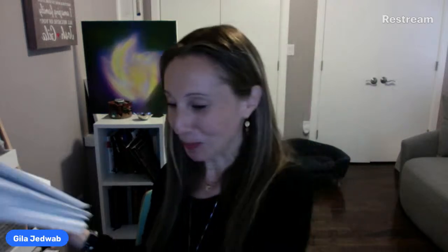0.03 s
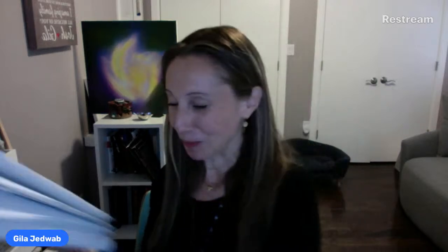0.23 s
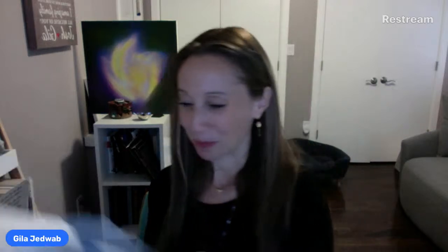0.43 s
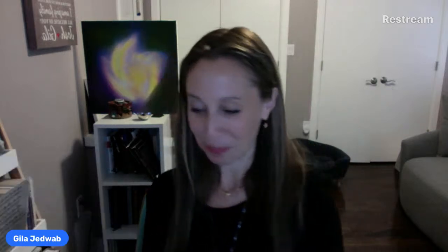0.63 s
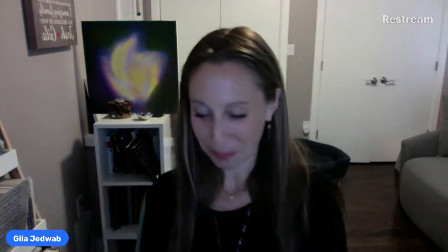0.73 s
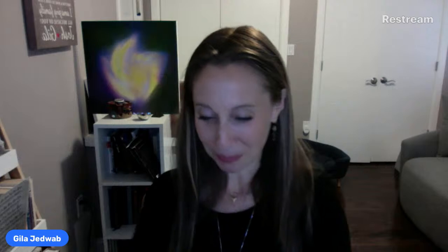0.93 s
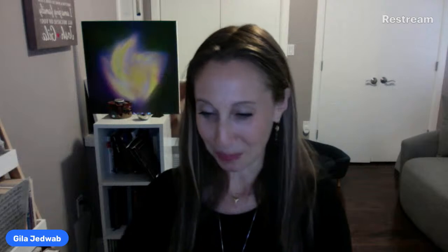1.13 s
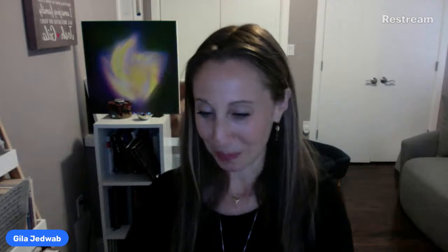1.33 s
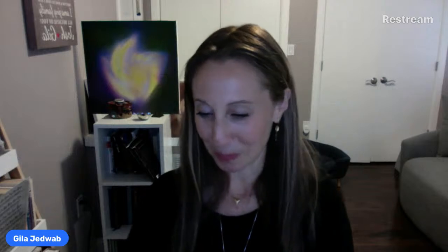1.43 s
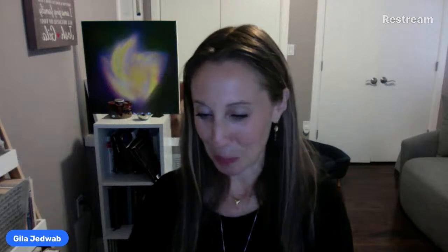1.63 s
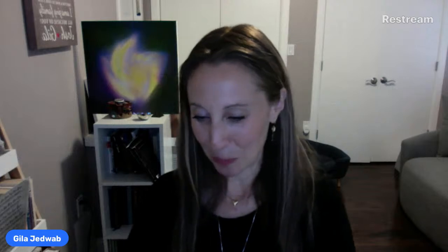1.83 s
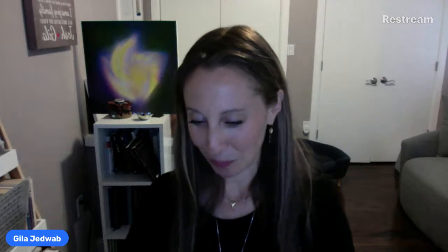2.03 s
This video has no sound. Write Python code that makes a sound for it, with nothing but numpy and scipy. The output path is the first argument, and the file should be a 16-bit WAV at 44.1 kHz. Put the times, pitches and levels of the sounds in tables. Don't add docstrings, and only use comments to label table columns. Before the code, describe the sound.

A stack of paper slaps onto a wooden desk, sheets are leafed through, then slapped down again

```python
import sys
import numpy as np
from scipy import signal
from scipy.fft import rfft, irfft
from scipy.io import wavfile
from scipy.ndimage import uniform_filter1d

SR = 44100
rng = np.random.default_rng(int(sys.argv[2]) if len(sys.argv) > 2 else 0)


def pcm_store(signal):
    levels = np.round(np.clip(np.atleast_2d(signal), -1, 1) * 32767)
    wavfile.write(sys.argv[1], SR, levels.astype(np.int16).T)


def volts_from_db(level):
    exponent = np.asarray(level, float) / 20
    return 10 ** exponent


N = 92257


def evened(x):
    return x / np.sqrt(np.mean(x ** 2) + 1e-20)


def read(points, hz):
    f, value = np.transpose(points)
    return np.interp(np.log(hz + 1), np.log(f + 1), value)


def add(mix, s, sound):
    part = mix[round(s * SR):][:len(sound)]
    part += sound[:len(part)]


def smoothed(x, size):
    return uniform_filter1d(uniform_filter1d(x, size=size), size=size)


def resonate(x, hz, width):
    turn = np.exp(2j * np.pi * np.cumsum(hz * np.ones(len(x))) / SR)
    r = np.exp(-np.pi * width / SR)
    return 2 * (turn * signal.lfilter([1 - r], [1, -r], x / turn)).real


def resonate_twice(x, hz, width):
    return resonate(resonate(x, hz, width), hz, width)


def colour(x, points):
    gain = volts_from_db(read(points, np.fft.rfftfreq(len(x), 1 / SR)))
    return irfft(rfft(x) * gain, len(x))


def decayed(x, t60, size=256):
    hz, t, z = signal.stft(x, SR, nperseg=size)
    z = z * volts_from_db(-60 * t / read(t60, hz)[:, None])
    return signal.istft(z, SR, nperseg=size)[1][:len(x)]


def patchy(x):
    z = signal.stft(x, nperseg=256)[2]
    patches = uniform_filter1d(rng.standard_normal(z.T.shape), size=5, axis=0)
    patches = evened(uniform_filter1d(patches, size=6, axis=1))
    return evened(signal.istft(z * volts_from_db(3 * patches).T, nperseg=256)[1][:N])


def fibres():
    clicks_per_s, spread_db, clump_db = 22000, 2.5, 1
    clumps = evened(smoothed(rng.standard_normal(N), 90))
    size = volts_from_db(spread_db * np.minimum(rng.exponential(1, N), 4) + clump_db * clumps)
    return size * (rng.random(N) < clicks_per_s / SR) * rng.choice([-1., 1.], N)


def rubbing():
    # [t/s, rubbing level/dB, sheet body relative level/dB]
    slide = [(0, -56.5, -9.5), (.06, -58.5, -7), (.12, -47.5, -2), (.29, -77.5, 0), (.45, -88.5, -4.5),
             (.47, -50, -15), (.595, -80, 7), (.69, -54, 1.5), (.745, -47, -10.5), (.806, -40.5, -6.5),
             (.9, -45, -9), (.975, -63, -4.5), (1.09, -54.5, -14.5), (1.2, -32.5, -21.5),
             (1.344, -26, -8.5), (1.522, -52, -7.5), (1.56, -67, 7), (1.75, -52, -0.5), (1.871, -86.5, 6)]
    # [peak t/s, rubbing level/dB, rise to 20 dB down/s, fall/s,
    # sheet body relative level/dB]
    strokes = [(0.479, -43.5, 0.017, 0.0622, -14.5), (0.615, -37, 0.012, 0.0154, -5),
               (0.634, -61.5, .01, 0.02, 12.5), (0.718, -35, 0.0093, 0.006, -20.5),
               (0.763, -36, 0.014, 0.016, -2), (0.793, -25.5, .012, 0.012, -6),
               (0.811, -38, 0.0052, .025, -6.5), (.832, -24.5, 0.0048, 0.0178, -19),
               (.855, -35.5, 0.014, 0.0377, -15.5), (0.913, -33.5, 0.022, 0.0467, -20.5),
               (1.026, -54.5, 0.024, 0.044, -19), (1.141, -46.5, .04, 0.026, -22),
               (1.194, -33, .018, 0.16, -14.5), (1.248, -22.5, 0.0022, 0.00444, -15.5),
               (1.269, -26, 0.017, 0.017, -22), (1.467, -58, 0.0037, 0.052, -6.5),
               (1.594, -53.5, 0.033, 0.0428, 7.5), (1.607, -33.5, 0.0079, 0.024, -5.5),
               (1.686, -57, .004, 0.00884, -3), (1.717, -47.5, 0.0045, .004, -26),
               (1.727, -39, .005, 0.0098, -20), (1.738, -43, 0.018, 0.018, -10)]
    # [f/Hz, level/dB per Hz]
    hiss_spectrum = [(3000, -28), (6000, -14.5), (8000, -11), (8800, -3), (10700, 2), (15000, -2),
                     (16000, -4.5)]
    # [f/Hz, width/Hz, level/dB]
    modes = [(2300, 1000, -5), (2970, 1800, 0.5), (4700, 1100, -9.5), (6574, 1300, -9), (750, 260, -13),
             (1720, 1200, -13), (1100, 1900, -16), (4159, 1500, -3)]
    t = np.arange(N) / SR
    s, db, body_db = np.transpose(slide)
    hiss_power = volts_from_db(np.interp(t, s, db)) ** 2
    body_power = volts_from_db(np.interp(t, s, db + body_db)) ** 2
    for peak, db, rise, fall, body_db in strokes:
        away = np.where(t < peak, (peak - t) / rise, (t - peak) / fall)
        power = volts_from_db(db - 20 * away ** 2) ** 2
        hiss_power = hiss_power + power
        body_power = body_power + power * volts_from_db(body_db) ** 2

    clicks, body = fibres(), np.zeros(N)
    for f, width, db in modes:
        bend = evened(smoothed(rng.standard_normal((2, N)), 1500))
        hz, level_db = f * (1 + 0.025 * bend[0]), db + 2 * bend[1]
        body = body + volts_from_db(level_db) * evened(resonate_twice(clicks, hz, width))
    body = signal.sosfilt(signal.butter(2, 380, "high", fs=SR, output="sos"), body)
    hiss = colour(fibres(), [(20, -68.5), (1500, -43.5), *hiss_spectrum])
    return np.sqrt(hiss_power) * patchy(hiss) + np.sqrt(body_power) * patchy(body)


def room(x):
    # [f/Hz, t60/s]
    t60 = [(100, 0.25), (500, 0.16), (2000, 0.34), (6000, 0.1), (16000, 0.25)]
    taps = np.zeros(SR // 2)
    at = np.arange(200, len(taps) - 20, 20)
    taps[at + rng.integers(0, 20, len(at))] = rng.choice([-1., 1.], len(at))
    tail = decayed(taps, t60)
    return signal.fftconvolve(x, tail / np.linalg.norm(tail))[:N]


def air():
    # [f/Hz, level/dB per Hz]
    spectrum = [(18, -52.5), (30, -25), (404, 1.5), (1350, -9), (3580, -12.5), (3870, -21), (4650, -18),
                (6050, -20.5), (16000, -27.5)]
    # [t/s, level/dB]
    gate_open = [(0, 19), (.07, 19.5), (0.349, -1.5), (.46, -1.5), (.55, 6.5), (1.3, 6), (1.8, 3.5),
                 (2.09, -22.5)]
    # [f/Hz, width/Hz, level/dB]
    leftovers = [(1620, 200, -92.5), (2300, 250, -95), (3600, 250, -97.5)]
    rumble = evened(resonate_twice(rng.standard_normal(N), 289, 150))
    rumble = rumble + 0.3 * evened(resonate_twice(rng.standard_normal(N), 130, 50))
    gate = volts_from_db(-74 + np.interp(np.arange(N) / SR, *np.transpose(gate_open)))
    hiss = volts_from_db(-77) * patchy(colour(rng.standard_normal(N), spectrum))
    bands = sum(volts_from_db(db) * patchy(resonate_twice(rng.standard_normal(N), hz, width))
                for hz, width, db in leftovers)
    return hiss + bands + gate * rumble


def scrape(s, db, hz, width, half):
    reach = 0.06
    t = np.arange(-reach, reach, 1 / SR)
    grit = rng.standard_normal(len(t)) * volts_from_db(3.4 * np.minimum(rng.exponential(1, len(t)), 4))
    envelope = volts_from_db(db - 6.5 - 20 * np.abs(t / half) ** 3)
    sound = envelope * evened(resonate_twice(grit, hz, width))
    skip = max(round((reach - s) * SR), 0)
    return s + t[skip], sound[skip:]


def landing(s, crack_db, slap_db, desk_db, pitch):
    # [f/Hz, level/dB, t60/s]
    modes = [(61, -17, 0.21), (96.5, -13.5, 0.45), (142.44, 2, 0.23), (152.8, -10, 0.33),
             (251.81, -1.5, 0.2), (321.63, 3.5, 0.15), (429.6, -10, .2), (554.4, -8.5, 0.19),
             (680, -10, 0.35), (740, -16.5, 0.067), (849, -10.5, 0.078), (1111, -25.5, 0.18)]
    # [f/Hz, level/dB per Hz]
    slap_spectrum = [(35, -34), (70, -4), (350, -0.5), (900, -4.5), (2470, -10), (4600, -14.5), (7060, -25),
                     (9130, -17.5), (16000, -29)]
    # [f/Hz, t60/s]
    slap_t60 = [(60, 0.44), (300, 0.3), (1000, 0.3227), (3000, 0.25), (8000, 0.17), (16000, 0.24)]
    crack_s, burst_s, desk_rise_s = 0.00024, 0.0052, 0.0046
    slap_tail_db, scatter_db = -13.5, 7.5
    tail_cut_s = 0.3
    t = np.arange(0, .5, 1 / SR)
    damping = 2.16 ** (10 * (1 - pitch))

    crack = np.sin(2 * np.pi * 2000 * t) * t / crack_s * np.exp(1 - t / crack_s)
    crack = crack + .6 * np.sin(2 * np.pi * 5000 * t) * np.exp(-t / 0.00035)
    crack = crack + .5 * np.sin(2 * np.pi * 9500 * t) * np.exp(-t / 0.00017)

    slap = decayed(evened(colour(rng.standard_normal(len(t)), slap_spectrum)), slap_t60)
    slap = slap * np.minimum(t / .001, 1)
    slap = slap * (np.exp(-t / burst_s) + volts_from_db(slap_tail_db - 100 * (damping - 1) * t))

    desk = np.zeros(len(t))
    for hz, db, t60 in modes:
        chance, phase = rng.random(2)
        envelope = volts_from_db(db + scatter_db * (2 * chance - 1.5) - 60 * damping * t / t60)
        desk = desk + envelope * np.sin(2 * np.pi * (hz * pitch * t + phase))
    desk = desk * (1 - np.exp(-t / desk_rise_s))
    desk_gain = volts_from_db(desk_db - 20 * (damping * t / tail_cut_s) ** 4)
    return s, volts_from_db(crack_db) * crack + volts_from_db(slap_db) * slap + desk_gain * desk


def snap(s, db, hz, t60, tick_db):
    sag = 0.065
    t = np.arange(0, .2, 1 / SR)
    ring = np.zeros(len(t))
    for ratio, share in [(1, 0.898), (0.99, 0.424), (0.68, 0.375), (1.2, 0.28), (1.6, 0.2)]:
        ring = ring + share * np.sin(2 * np.pi * hz * ratio * t * (1 + sag - sag * t / t60))
    rise = np.sin(np.pi / 2 * np.minimum(t * hz / 2.29, 1)) ** 2
    ring = .5 * rise * volts_from_db(-60 * t / t60) * ring

    tick = rng.standard_normal(len(t)) * t / 0.0012 * np.exp(1 - t / 0.001035)
    band = [min(0.59 * hz, 2000), min(1.31 * hz, 15000)]
    tick = signal.sosfilt(signal.butter(2, band, "band", fs=SR, output="sos"), tick)
    return s, volts_from_db(db) * (ring + volts_from_db(tick_db) * tick)


def scene():
    # [middle t/s, level/dB, f/Hz, width/Hz, half length/s]
    scrapes = [(.02, -60.5, 1379, 900, 0.081), (0.077, -46, 5473, 1500, 0.0083),
               (.471, -48.5, 4732, 200, 0.0056), (.477, -48, 750, 301.7, 0.00615),
               (.487, -48.5, 4810, 700, 0.0075), (.542, -46.5, 1644, 700, 0.0076),
               (.618, -29, 4586, 503, 0.00945), (.616, -39, 5680, 500, 0.0103),
               (.617, -33.5, 2426, 700, 0.01303), (0.62, -38, 3420, 500, 0.0108),
               (0.641, -57, 5530, 600, 0.0086), (.642, -47.5, 4570, 700, .016),
               (0.712, -22.5, 2300, 700, 0.0061), (0.734, -34, 2570, 1177, 0.018),
               (.761, -42.5, 2440, 800, 0.023), (.765, -43, 4435, 888.3, 0.0052),
               (0.79, -30, 4700, 1100, .011), (.793, -34.5, 1990, 804.6, 0.021),
               (.817, -37.5, 4482, 1100, .012), (0.836, -30, 2198, 500, 0.011),
               (0.837, -36, 7500, 1525, 0.0079), (0.851, -38, 2300, 506.4, 0.0094),
               (0.871, -32, 2335, 613, 0.0051), (0.904, -43, 4700, 707, 0.014),
               (.912, -50, 2179, 400, 0.028), (1.081, -56, 1517, 1789, 0.0067),
               (1.162, -44, 1770, 601, 0.0042), (1.176, -50, 5130, 399.6, 0.0051),
               (1.199, -43.5, 2390, 305.8, 0.005), (1.552, -52.5, 2300, 300, 0.01),
               (1.594, -35.5, 1890, 877, 0.0239), (1.6, -36, 3170, 1100, 0.0152),
               (1.649, -54, 820, 248.1, 0.0136), (1.682, -50, 1710, 500, 0.0056),
               (1.764, -53, 700, 150, 0.0188), (.72, -38.5, 4700, 875.6, 0.0158),
               (.728, -33.5, 623, 396, 0.018), (1.64, -41.5, 2073, 897, 0.0283),
               (1.324, -20, 2060, 1220, 0.0123), (.088, -19, 803.4, 347, .007)]
    # [t/s, crack peak level/dB, slap level/dB, desk level/dB, desk pitch factor]
    landings = [
        (.075, -39.5, -31, -53, 1.02),
        (0.0825, -1.5, -11.5, -20.5, 1.03),
        (.121, -27, -21.5, -18, 0.9884),
        (.133, -45.5, -31.5, -25, 0.992),
        (1.3143, -20.5, -20.5, -29.5, 0.9685),
        (1.3297, -10, -16.5, -13.5, 0.837),
        (1.345, -34.5, -31.5, -21, 0.92),
        (1.361, -40.5, -22, -26, 0.95),
        (1.39, -50.5, -34.5, -34.5, .92),
    ]
    # [t/s, peak level/dB, f/Hz, ring t60/s, tick relative level/dB]
    snaps = [(.483, -12.5, 759.3, 0.0399, -15), (.497, -18.5, 711.4, 0.0715, -30),
             (.505, -29.5, 753, 0.0613, -34.5), (.539, -28, 795, 0.0279, -12),
             (.547, -31, 704, 0.1054, -13), (.604, -50, 12300, 0.0143, -29.5),
             (0.7047, -4, 2300, 0.0155, -30.5), (.7055, -17, 680, 0.036, 0.5),
             (.709, -20, 1100, 0.0296, 9.5), (.713, -23, 2740, 0.016, -28), (.787, -33, 704.2, 0.049, -9.5),
             (.833, -32, 740, 0.038, -28), (.988, -42.5, 2070, 0.034, -1.5), (1.159, -35, 1475, 0.027, 4),
             (1.2383, -4, 10460, 0.00442, -20), (1.24, -29, 750, 0.0205, -24.5),
             (1.463, -37, 2347, 0.045, -15), (1.465, -25, 4365, 0.0064, -15),
             (1.59, -34.5, 739, 0.042, -14.5), (1.6078, -10.5, 3183, 0.00547, -27),
             (1.612, -16, 2094, 0.00705, -8), (1.685, -36, 732.3, 0.035, -20.5),
             (1.717, -23, 9070, 0.0343, -42), (1.732, -32, 3313, 0.047, -18),
             (1.2385, -17.5, 4700, 0.0032, -5.5)]
    near = rubbing()
    for row in scrapes:
        add(near, *scrape(*row))
    for row in landings:
        add(near, *landing(*row))
    for row in snaps:
        add(near, *snap(*row))
    return (near + volts_from_db(-14.5) * room(near) + air())[None]


def roll_off(x):
    return signal.sosfilt(signal.butter(12, 16820, fs=SR, output="sos"), x)


def record(dry):
    low_cut = signal.sosfilt(signal.butter(2, 70, "high", fs=SR, output="sos"), dry)
    edge = signal.firwin(401, 16050, window=("kaiser", 7), fs=SR)
    mix = np.clip(signal.oaconvolve(low_cut, edge[None], "same"), -1, 1)
    return roll_off(mix)


dry = scene()
out = record(dry)
pcm_store(out)
```